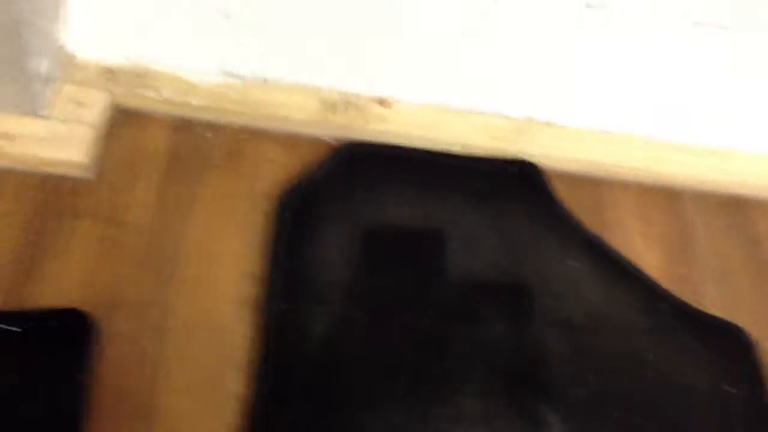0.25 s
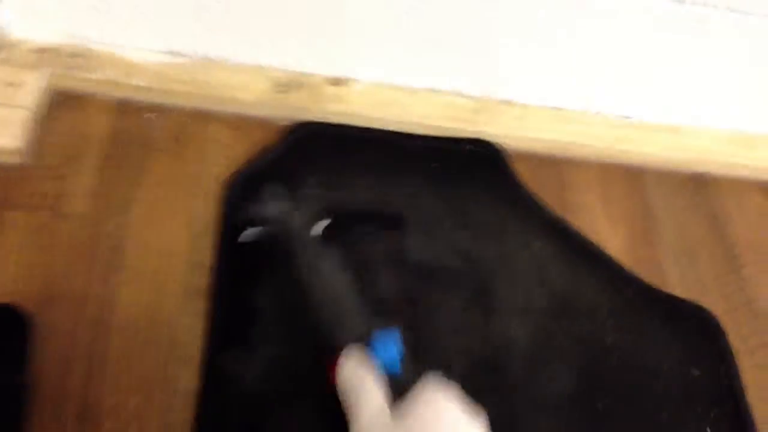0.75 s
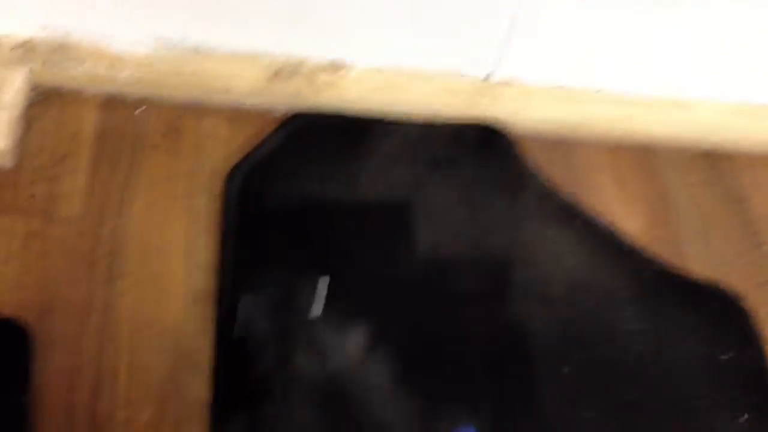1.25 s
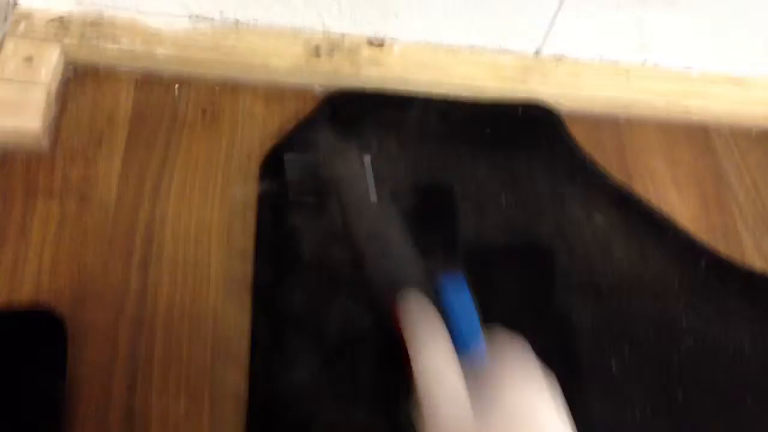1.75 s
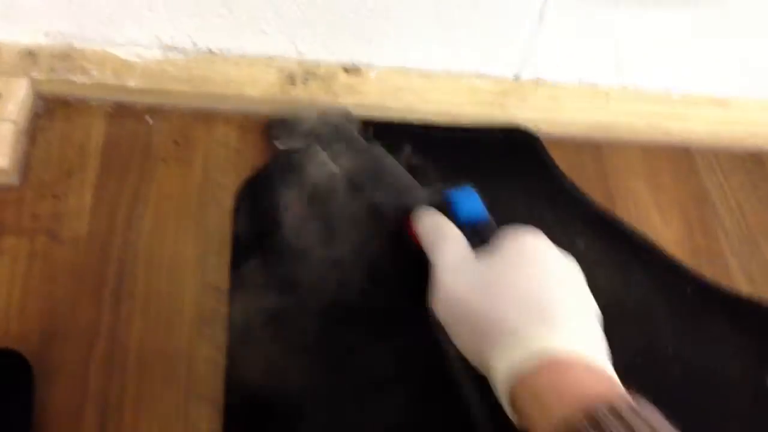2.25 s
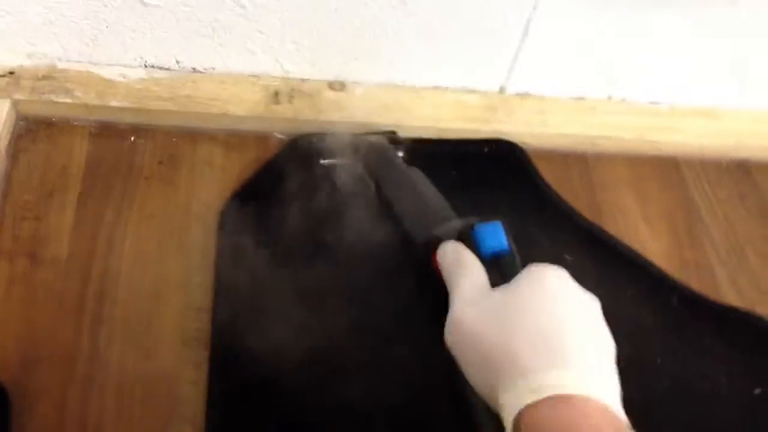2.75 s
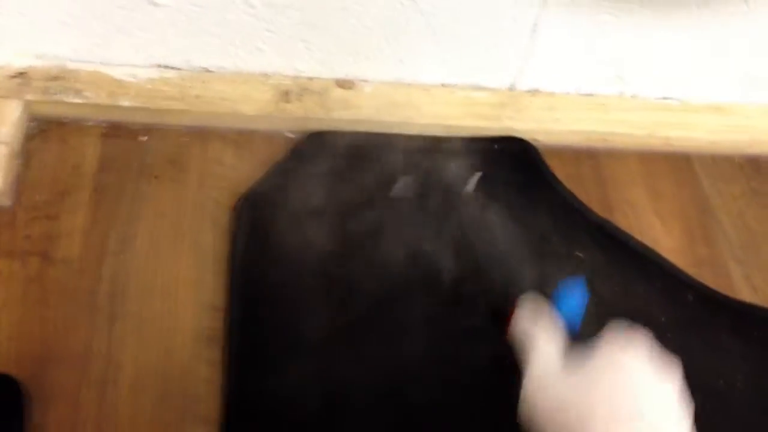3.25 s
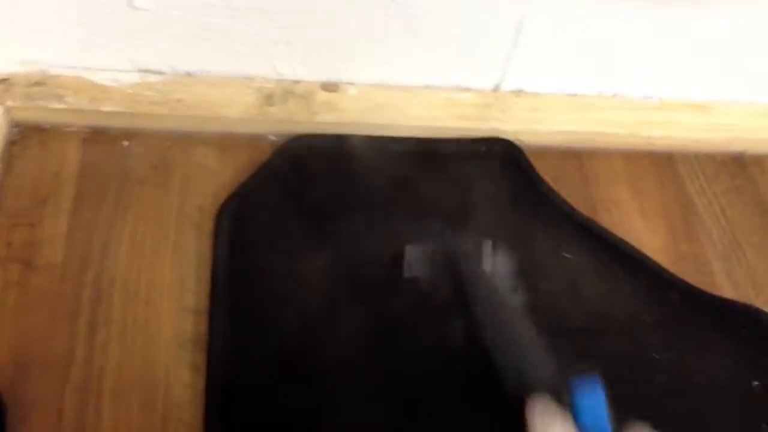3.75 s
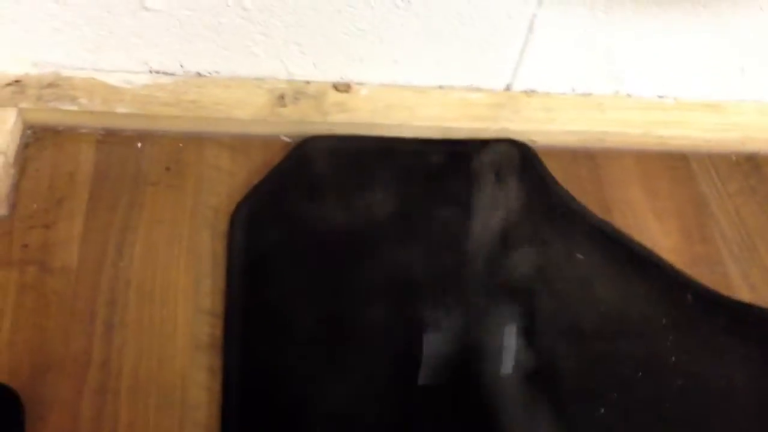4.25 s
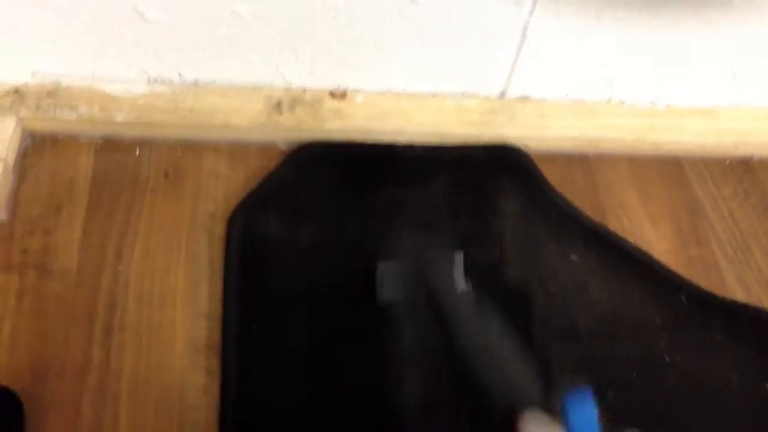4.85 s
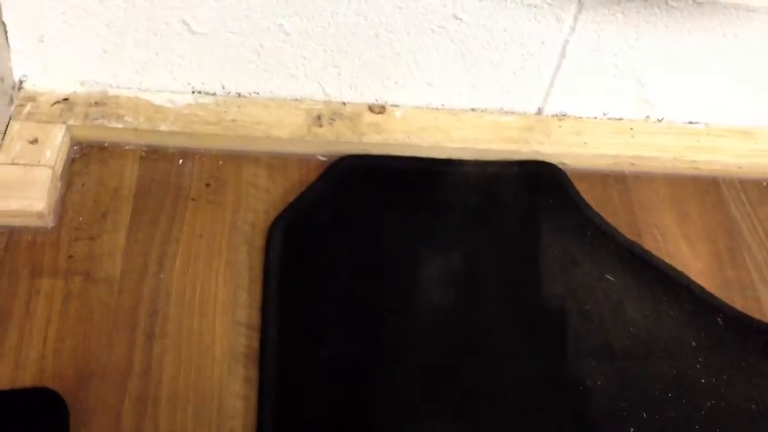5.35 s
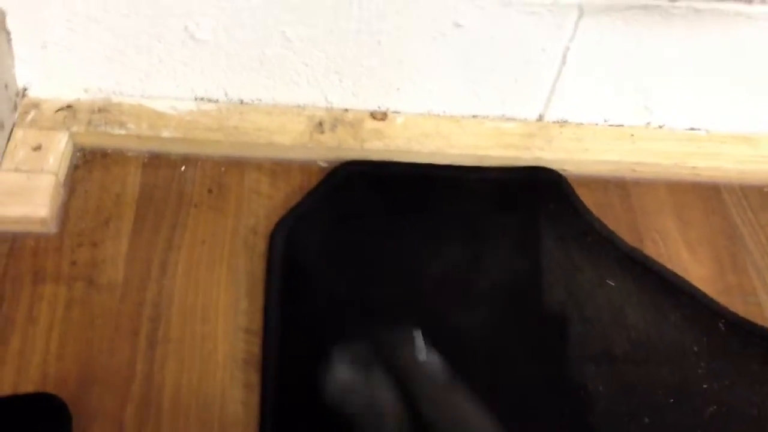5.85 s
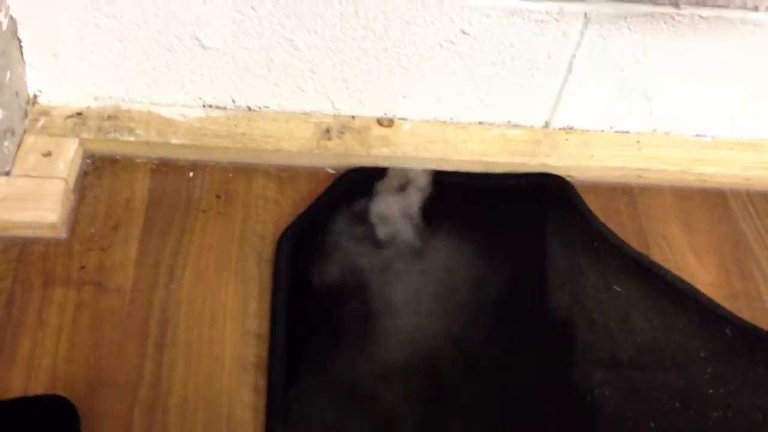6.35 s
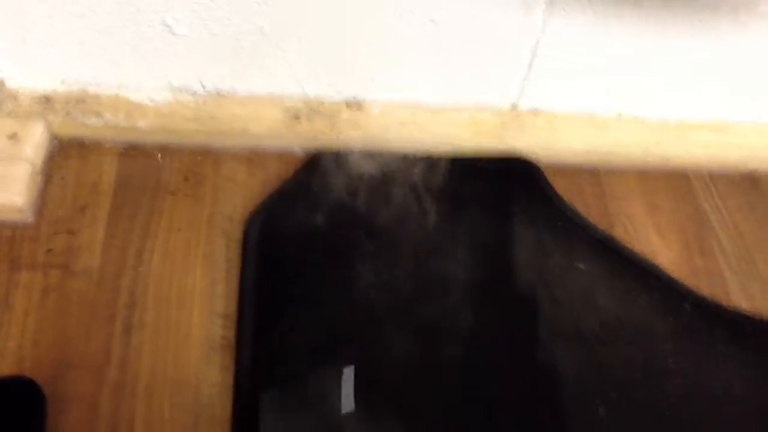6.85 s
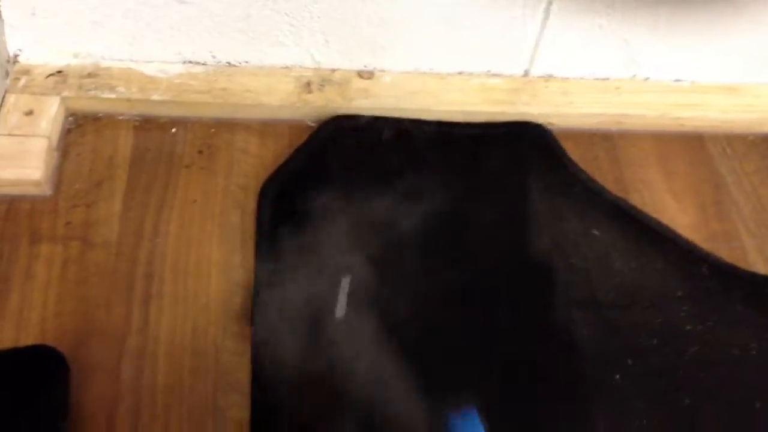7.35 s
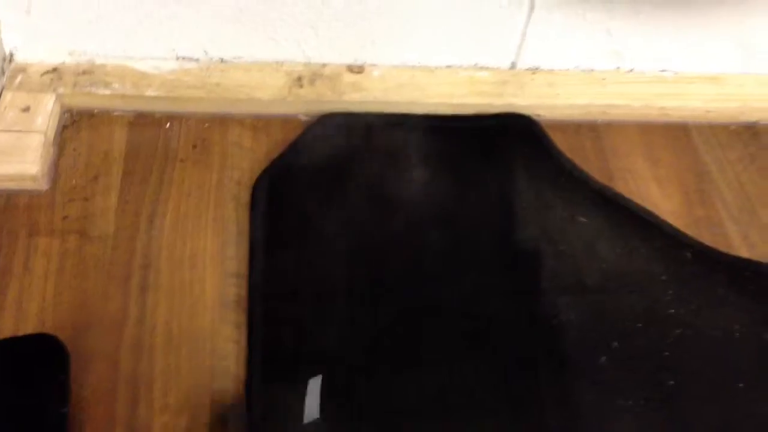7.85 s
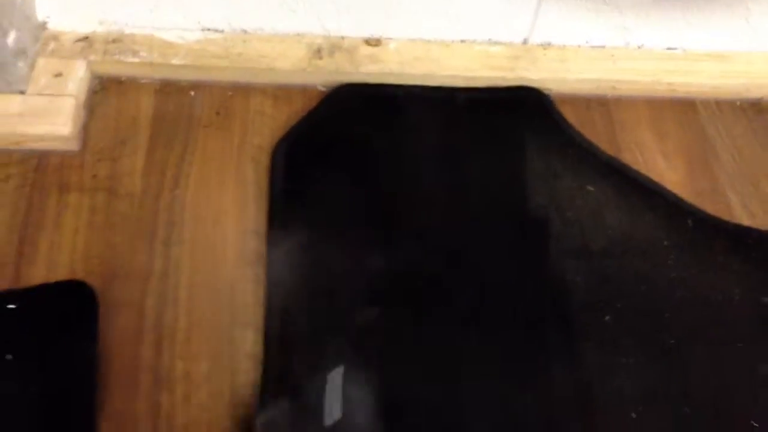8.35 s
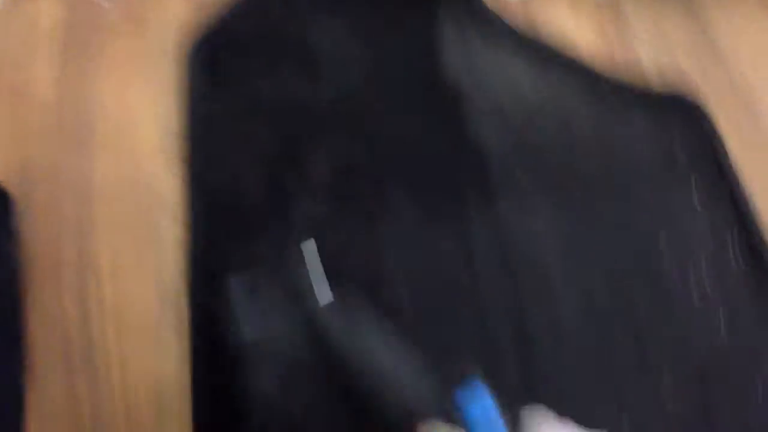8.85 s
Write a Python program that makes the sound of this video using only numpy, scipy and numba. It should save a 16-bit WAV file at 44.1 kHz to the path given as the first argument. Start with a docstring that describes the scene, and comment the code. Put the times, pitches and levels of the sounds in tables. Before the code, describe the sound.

Gusty hiss of steam and air from a cleaner head sweeping over a carpeted mat, with a steady motor whine and brief high whistles.

```python
"""First comes a gusty roar and hiss: steam and air tear through the slot of a steam cleaner's suction head.
A hand sweeps the head to and fro over a carpet mat by a wall, and it rumbles on the pile. The wall's
echo mixes with the hiss and changes its colour as the head nears and leaves it. The vacuum motor sings a
steady tone over its own air noise. Now and then the slot whistles or the head scrapes. One microphone."""
import sys
import numpy as np
from scipy import signal
from scipy.fft import rfft, irfft
from scipy.io import wavfile
from scipy.ndimage import uniform_filter1d, map_coordinates
from numba import njit

SR = 44100
rng = np.random.default_rng(int(sys.argv[2]) if len(sys.argv) > 2 else 0)


def store_pcm(level_fs):
    """Save levels as 16-bit WAV."""
    pcm = np.round(np.clip(level_fs, -1, 1) * 32767).astype(np.int16)
    wavfile.write(sys.argv[1], SR, np.atleast_2d(pcm).T)


N = 401310

# the slot's four noises, low to high: f/Hz, width/Hz, relative level/dB
RUSH_BANDS = [(535, 257, -1.4), (882, 470, 0.86)]
ROAR_BANDS = [(1460, 680, 0.5), (2060, 1070, 0)]
JET_BANDS = [(3000, 1060, -1.2), (4150, 2100, 0.71)]
HISS_BANDS = [(5770, 2900, 4.5), (7320, 3100, -2), (8880, 1300, -4)]
# how hard the flow drives each noise, in three blocks: t/s, rush/dB, roar/dB, jet/dB, hiss/dB
FLOW_DRIVE = [
    [(0.0, -37, -27, -27, -32), (0.07, -40, -27.5, -25, -25), (0.29, -39.5, -37.5, -33, -35),
     (0.53, -35.5, -27.5, -28.5, -34), (0.7, -40, -34, -40, -35), (0.77, -51, -43, -40, -37),
     (0.81, -44, -36.5, -34, -37), (0.96, -37.5, -33, -25.5, -30.5), (0.98, -41, -40, -29.5, -31.5),
     (1.11, -38.5, -34, -30, -34), (1.14, -48, -45, -33, -42), (1.22, -36.5, -32, -30, -32),
     (1.39, -37, -28.5, -30.5, -35), (1.42, -55, -45, -36, -39), (1.44, -39, -29, -42, -40),
     (1.45, -35, -40, -33, -37), (1.48, -38, -36, -40, -34), (1.55, -38, -31.5, -33, -35),
     (1.63, -32, -28, -28, -32), (1.66, -31.5, -25, -26, -31), (1.74, -29, -26, -26, -35),
     (1.77, -42, -36, -31, -35), (1.84, -34, -28.5, -30, -32), (1.87, -42, -49, -32, -35),
     (1.9, -39, -30, -30, -36), (2.14, -55, -38, -35, -38), (2.23, -35, -26, -29, -37),
     (2.31, -38, -29, -27.5, -33), (2.34, -34.5, -30, -31.5, -41), (2.48, -49, -35.5, -28, -26.5),
     (2.58, -34, -33, -28.5, -38), (2.59, -48, -28, -29.5, -39), (2.71, -41, -43, -31.5, -38),
     (2.74, -39, -34, -40, -50), (2.78, -45, -52, -39, -41), (2.95, -40, -36, -39, -41),
     (3.0, -43, -37, -32, -36)],
    [(3.0, -47, -38, -30, -37), (3.05, -40, -25.5, -25.5, -30), (3.13, -40, -30, -28.5, -32),
     (3.31, -39, -35, -28.5, -36), (3.35, -38, -40, -33, -50), (3.41, -54, -48, -40, -50),
     (3.48, -43, -48, -44, -48), (3.54, -43, -47, -35, -50), (3.57, -42, -48, -31, -32),
     (3.58, -40, -29, -30, -39), (3.63, -50, -29, -26, -31), (3.69, -43, -32, -31, -33),
     (3.84, -50, -31.5, -29.5, -37), (3.91, -40, -33.5, -28, -37), (3.93, -36, -46, -37, -42),
     (3.98, -39, -39, -36, -45), (4.12, -45, -40, -42, -49), (4.13, -41, -43, -36, -51),
     (4.19, -52.5, -31, -27.5, -37), (4.24, -44, -33, -27.5, -33), (4.84, -37, -29, -27, -34),
     (4.97, -55, -31, -31, -35), (5.0, -40, -30, -28, -35), (5.13, -44, -43, -39, -46),
     (5.18, -40, -28.5, -29.5, -32.5), (5.26, -42, -25.5, -26.5, -28), (5.36, -40, -34.5, -27, -32),
     (5.56, -42, -32, -28.5, -34), (5.66, -41, -35.5, -33.5, -41), (5.77, -39, -38.5, -28, -36),
     (5.93, -37.5, -32, -29.5, -36), (5.96, -51, -45, -34, -38), (5.98, -39, -47, -30, -33),
     (6.0, -50, -33, -35, -50)],
    [(6.0, -45, -43, -34, -49), (6.02, -55, -33, -37, -39), (6.09, -41, -47, -42, -43),
     (6.23, -58, -37, -32, -34), (6.28, -42, -39, -32.5, -35), (6.56, -38, -35, -27.5, -33),
     (6.64, -44, -40, -33, -37), (6.65, -47, -46, -33.5, -46), (6.76, -39, -35, -32, -37),
     (6.9, -40, -33, -31.5, -37), (6.91, -34, -43, -38, -33), (6.95, -43, -28, -29.5, -33),
     (7.1, -34, -38, -35, -35), (7.12, -44, -31, -37, -34), (7.19, -57, -42, -51, -35),
     (7.3, -56, -37.5, -43, -39), (7.33, -57, -51, -44, -33), (7.42, -34, -26, -27.5, -30.5),
     (7.59, -36.5, -22, -23.5, -29.5), (7.75, -37, -29, -28.5, -37.5), (7.89, -30, -22.5, -24.5, -29),
     (8.04, -35, -23.5, -27.5, -33), (8.17, -39, -35.5, -31.5, -38), (8.28, -36, -31.5, -31, -34),
     (8.33, -35.5, -27, -28, -35), (8.41, -38, -22.5, -26.5, -32), (8.47, -38, -28.5, -26, -35),
     (8.49, -38, -31, -25.5, -36), (8.58, -39, -35, -30, -31), (8.61, -46, -44, -32, -36),
     (8.63, -36, -34, -29.5, -35), (8.68, -38, -29, -27, -38), (8.76, -42, -30, -28.5, -37),
     (8.8, -39, -36, -30, -38), (8.88, -39.5, -42, -33.5, -39), (8.94, -39, -43, -29, -34),
     (9.0, -45, -47, -41, -45), (9.06, -37, -43, -31, -41), (9.1, -43, -52, -45, -45)],
]
# two narrow peaks in the roar and jet glide in pitch as the head moves:
# t/s, low f/Hz, level within roar/dB, high f/Hz, level within jet/dB
GLIDING_PEAKS = [(0, 2130, -6, 3600, 0), (.3, 2060, -2, 3900, -4), (.55, 1790, -12, 3470, -2),
                 (.85, 2010, -11, 4100, -9), (1.1, 1690, -2, 3170, -13), (1.36, 1730, -12, 3080, -4),
                 (1.56, 1800, 1, 4320, -2), (1.64, 2000, -11, 3770, -13), (1.72, 1700, -12, 3100, -5),
                 (1.95, 2130, -8, 3830, -9), (2.18, 1980, -6, 3620, -9), (2.3, 1370, -1, 3120, 5),
                 (2.45, 1550, -1, 4360, -14), (2.58, 1610, -2, 4160, -5), (2.8, 2010, -13, 4000, -14),
                 (3.02, 2000, -6, 4530, -6), (3.12, 1530, -1, 4120, 2), (3.25, 1570, 8, 4440, -1),
                 (3.35, 2000, -13, 4930, -10), (3.57, 2040, 5, 4900, -1), (3.62, 1750, -2, 4200, -3),
                 (3.68, 1400, 1, 3900, 1), (3.76, 1360, -5, 3650, -1), (3.84, 1400, -2, 4280, -1),
                 (3.91, 1550, -6, 5260, -5), (4.17, 2150, 4, 4700, -2), (4.2, 1850, 0.5, 4300, 1),
                 (4.24, 1500, -5, 3700, -1), (4.3, 1340, -8, 3720, -12), (4.38, 1810, -1, 4100, -7),
                 (4.45, 1520, -2, 4000, -5), (4.54, 1630, -6, 4300, -3), (4.62, 1760, 3, 3900, -14),
                 (4.68, 1800, -6, 3800, -9.5), (4.74, 1970, 6.5, 3820, -9), (4.96, 1640, -17, 4120, -3),
                 (5.14, 2300, -10, 5000, -4), (5.17, 1980, -5, 4720, 8), (5.22, 1570, -7, 3600, -2),
                 (5.28, 1400, -4, 3500, -8), (5.47, 1690, -7, 4200, -17), (5.75, 1770, 4, 4050, -8),
                 (6.1, 1830, -7, 4170, -9), (6.55, 1540, -9, 4100, -14), (6.97, 1790, -3, 4000, -11),
                 (7.3, 1670, -7, 3900, -8), (7.42, 1950, -3, 3300, 1), (7.5, 1510, -6, 3180, -5),
                 (7.58, 1750, -6, 3960, -5), (7.72, 1630, -6, 3220, -13), (7.8, 1650, -4, 4100, -5),
                 (7.87, 1700, -13, 3760, 2), (7.93, 1650, -12, 3500, -6), (8.03, 1600, -11, 3200, -2),
                 (8.12, 1400, -9, 4000, 0), (8.25, 1500, -12, 3600, -9), (8.36, 1340, -2, 3250, -6),
                 (8.44, 1700, -7, 3700, -6), (8.7, 1610, -14, 4130, 1), (9.1, 1770, -5, 4000, -16)]
# strength of the three sizzle bands: t/s, low/dB, middle/dB, high/dB
SIZZLE_LEVELS = [(0.0, -40, -39, -35), (0.05, -31, -27, -30), (0.1, -33, -25.5, -27), (0.12, -43, -35, -35),
                 (0.25, -42, -38, -42), (0.56, -37, -41, -39), (0.81, -42, -47, -48), (0.94, -42, -40, -35),
                 (1.06, -47, -41, -43), (1.54, -38, -48, -44), (1.7, -33, -40, -43), (1.8, -41, -45, -44),
                 (1.82, -36, -40, -35), (1.98, -43, -45, -49), (2.23, -42, -48, -47), (2.28, -35, -41, -43),
                 (2.36, -43, -50, -43), (2.48, -35, -38, -36), (2.74, -47, -54, -54), (2.99, -43, -49, -45),
                 (3.09, -35, -34, -29), (3.17, -45, -47, -50), (3.4, -44, -53, -50), (3.6, -42, -46, -45),
                 (3.67, -41, -40, -38), (3.85, -44, -48, -51), (4.16, -43, -46, -48), (4.43, -40, -36, -39),
                 (4.64, -44, -47, -47), (4.74, -43, -37, -41), (5.14, -41, -49, -54), (5.19, -41, -46, -45),
                 (5.25, -33, -34, -33), (5.3, -36, -34, -30), (5.35, -43, -39, -40), (5.62, -42, -38, -44),
                 (5.93, -41, -42, -37), (6.03, -40, -48, -49), (6.16, -43, -47, -47), (6.26, -44, -43, -35),
                 (6.51, -38, -34.5, -44), (6.82, -44, -38, -44), (6.97, -42, -37, -34),
                 (7.07, -38, -45, -43), (7.27, -41, -51, -44), (7.45, -33, -41, -32), (7.58, -44, -27, -34),
                 (7.78, -49, -41, -43), (7.83, -42, -32, -36), (7.98, -35, -33, -33), (8.11, -43, -48, -45),
                 (8.44, -40, -36, -34), (8.46, -48, -38, -41), (8.72, -47, -35, -37), (9.02, -49, -50, -47),
                 (9.1, -45, -41, -40)]
# borders of those bands: f/Hz
SIZZLE_EDGES = [9450, 11200, 13600, 16500]
# added to each band's strength: gain/dB
SIZZLE_GAINS = [-2.2, -1.5, 3]
# where the hand turns: t/s, echo delay/ms, rumble of the next stroke/dB, echo share/0-1
HAND_TURNS = [(-.05, 0.92, -46.5, 0.3), (.27, 1.9, -41.5, 0.44), (.78, 0.64, -44.5, .35),
              (1.13, 1.6, -39.5, 0.56), (1.6, 0.5, -38, 0.3), (1.93, .9, -40, 0.4),
              (2.28, 0.28, -40.5, 0.27), (2.57, 0.6, -43.5, 0.38), (2.9, 0.35, -39, 0.2),
              (3.17, 0.62, -41.5, 0.3), (3.47, 0.22, -43, 0.06), (3.75, 0.75, -40.5, 0.3),
              (4.04, 0.22, -44, 0.38), (4.62, 1.7, -42, 0.42), (5.12, 0.4, -45, 0.14),
              (5.63, 1.84, -42, 0.5), (6.1, 0.66, -46, .15), (6.65, 2.04, -42.5, 0.53),
              (7.22, 0.67, -43, 0.72), (7.71, 1.95, -41, 0.4), (8.15, 0.82, -44.5, 0.44),
              (8.68, 2.53, -47, 0.5), (9.04, 1.7, -46, 0.3), (9.3, 2, -48, .15)]
# the head's rumble on the pile: f/Hz, width/Hz, relative level/dB
DRAG_BANDS = [(159, 38, -5.5), (211.5, 66, -2), (274, 144, -1)]
# the motor's tones: t/s, shaft f/Hz, shaft level/dB, blade level/dB
MOTOR_TONES = [(0, 340, -35, -45), (.6, 337, -34.5, -42), (1.6, 337.6, -34.5, -58),
               (1.9, 337.5, -35, -42.5), (2.7, 340.2, -34.5, -40), (3.08, 341, -35.5, -46),
               (3.35, 340.6, -36, -39), (3.6, 338.7, -36.5, -46), (3.9, 340, -36.5, -39.5),
               (4.3, 341.7, -37, -44), (4.7, 340, -35.5, -39), (5.4, 336.8, -35.5, -45),
               (5.9, 340, -36.5, -43), (6.5, 340.4, -37.5, -44), (7.1, 341.8, -37.5, -47),
               (7.45, 342, -37.5, -40), (7.9, 339.3, -36.5, -46), (8.3, 336.7, -37.5, -57),
               (9.1, 337.4, -36.5, -42)]
# a faint hum: t/s, level/dB
HUM_LEVELS = [(0, -48), (6.1, -53), (7.3, -44.5), (7.7, -62), (8.6, -59), (8.9, -46), (9.1, -63)]
# the fan's air noise: f/Hz, relative level/dB
FAN_COLOUR = [(18, -87), (30, -62), (70, -38), (168, -17.5), (255, -16), (339, -5.5), (418, -14),
              (502, -12), (1760, -5), (2530, -8.5), (4050, -4.5), (4800, -8), (5500, -13.5), (7000, -14),
              (10000, -18), (13000, -27), (15300, -22)]
# the slot's short whistles: start t/s, length/s, level/dB, f/Hz
SLOT_CHIRPS = [(.33, .06, -45, 9330), (.7, .08, -44, 9400), (.98, .07, -37, 8800), (1.395, 0.05, -37, 9250),
               (1.87, .06, -38, 8820), (2.005, 0.091, -35, 8700), (2.64, 0.059, -36.5, 8850),
               (2.727, .03, -41, 8800), (2.98, .074, -42, 9000), (3.115, 0.039, -29.5, 8700),
               (3.165, .04, -41, 9000), (3.226, .05, -40, 8860), (3.31, 0.052, -41, 9100),
               (3.532, 0.087, -39, 8900), (3.673, 0.094, -38, 8960), (3.776, .02, -38, 9500),
               (3.8, 0.035, -29.5, 8750), (3.877, 0.076, -41, 8970), (4.136, 0.02, -30, 9120),
               (4.242, 0.17, -36, 8800), (4.43, 0.082, -42, 8800), (4.544, 0.026, -49, 8800),
               (4.8, 0.16, -36, 8800), (5.01, 0.036, -47, 8950), (5.332, 0.14, -35, 8800),
               (5.75, .05, -44, 8800), (6.08, .05, -44, 8750)]
# the head digs into the pile: t/s, half length/s, level/dB
SCRAPE_SWELLS = [(1.3, .07, -40), (1.66, 0.078, -45), (2.262, 0.058, -41), (4.962, 0.04, -39),
                 (5.82, 0.059, -37), (6.25, 0.047, -40), (6.812, 0.032, -40), (6.995, 0.05, -32)]
# the rumble of a scrape: f/Hz, width/Hz, relative level/dB
SCRAPE_BANDS = [(169, 60, 1), (211, 31, 2.5)]

TIME = np.arange(N) / SR


def undb(db):
    """Turn decibels into a factor to multiply by."""
    return 10 ** (np.asarray(db) / 20)


def unit(x):
    """Scale a signal to an average (RMS) size of 1."""
    return x / np.sqrt(np.mean(x ** 2))


def curves(table):
    """Join a table's rows with straight lines: one curve for each column after the time."""
    times, *columns = np.transpose(table)
    return [np.interp(TIME, times, column) for column in columns]


def wobble(rate):
    """A smooth random curve of size 1 that heads for a new value `rate` times a second."""
    hold = int(SR / rate)
    steps = np.repeat(rng.standard_normal(N // hold + 1), hold)
    return unit(uniform_filter1d(uniform_filter1d(steps, hold), hold)[:N])


@njit
def bandpass(x, hz, width):
    """Let through only the sound near a pitch that may move."""
    y, band, low = np.empty(len(x)), 0., 0.
    for i in range(len(x)):
        tuning, damping = np.tan(np.pi * hz[i] / SR), width / hz[i]
        passed = (band + tuning * (x[i] - low)) / (1 + tuning * (tuning + damping))
        band, low = 2 * passed - band, low + 2 * tuning * passed
        y[i] = damping * passed
    return y


def noise_bands(bands, flicker_db, rate, drift, gust_db=0):
    """Bands of noise: each drifts in pitch and flickers by itself, and all share the gusts."""
    total = 0
    for hz, width, db in bands:
        centre = np.minimum(hz * (1 + drift * wobble(3)), .45 * SR)
        band = bandpass(rng.standard_normal(N), centre, float(width))
        band = bandpass(band, centre, 1.41 * width)
        total += unit(band) * undb(db + flicker_db * wobble(rate))
    return unit(total * undb(gust_db))


def slot_flow():
    """Steam and air tear through the slot in quick gusts; two narrow peaks glide in pitch."""
    usual_flow_db, usual_sizzle_db = -30, -44
    rush_db, roar_db, jet_db, hiss_db = np.array(curves(np.vstack(FLOW_DRIVE))) - usual_flow_db
    low_hz, low_db, high_hz, high_db = curves(GLIDING_PEAKS)
    low_peak, high_peak = (low_hz, 190, low_db), (high_hz, 520, high_db)
    sizzle_db = curves(SIZZLE_LEVELS)
    gust = wobble(40)
    roar = noise_bands(ROAR_BANDS + [low_peak], flicker_db=1.8, rate=16, drift=.04, gust_db=.89 * gust)
    rush = noise_bands(RUSH_BANDS, flicker_db=.57, rate=16, drift=.012, gust_db=1.9 * gust)
    jet = noise_bands(JET_BANDS + [high_peak], flicker_db=.42, rate=22, drift=.013, gust_db=.52 * gust)
    hiss = noise_bands(HISS_BANDS, flicker_db=.4, rate=15, drift=.041, gust_db=1.05 * gust)
    # each noise has a usual level and grows with the flow; the hiss also follows the middle sizzle
    roar *= undb(-28.5 + .78 * roar_db)
    rush *= undb(-29.5 + rush_db)
    jet *= undb(-29 + jet_db)
    hiss *= undb(-29.5 + .78 * hiss_db + .17 * (sizzle_db[1] - usual_sizzle_db))
    slot = roar + rush + jet + hiss + sizzle(sizzle_db, 1.04 * gust)
    return slot - .19 * bandpass(slot, hz=np.full(N, 2560.), width=120.)  # a narrow dip in the colour


def sizzle(levels_db, gust_db):
    """The highest part of the slot's noise: three broad bands, each flickering by itself."""
    total = 0
    for low, high, gain_db, db in zip(SIZZLE_EDGES, SIZZLE_EDGES[1:], SIZZLE_GAINS, levels_db):
        band_filter = signal.butter(2, [low, high], "band", fs=SR, output="sos")
        band = signal.sosfilt(band_filter, rng.standard_normal(N))
        total += unit(band) * undb(gain_db + db + 1.4 * wobble(18) + gust_db)
    return total


def hand_strokes():
    """The hand eases from turn to turn, setting the echo's delay, the speed (0-1) and the rumble."""
    times, delay_ms, rumble_db, _ = np.transpose(HAND_TURNS)
    place = np.interp(TIME, times, np.arange(len(times)))
    stroke = np.minimum(place.astype(int), len(times) - 2)
    angle = np.pi * (place - stroke)
    eased_ms = delay_ms[stroke] + np.diff(delay_ms)[stroke] * (1 - np.cos(angle)) / 2
    return eased_ms, np.abs(np.sin(angle)), rumble_db[stroke]


def wall_echo(sound):
    """The wall sends the sound back a little later; from further off it returns duller."""
    far_hz, near_hz, dull_ms, patchy_db = 3600, 6500, 1.1, 1.5
    delay_ms = hand_strokes()[0] * (1 + .03 * wobble(12))  # the hand shakes a little
    far, near = (signal.sosfiltfilt(signal.butter(2, hz, fs=SR, output="sos"), sound)
                 for hz in (far_hz, near_hz))
    crisp = np.exp(-(delay_ms / dull_ms) ** 2)
    read_at = np.arange(N) - delay_ms * SR / 1000
    echo = map_coordinates(far + crisp * (near - far), [read_at], order=3, mode="nearest")
    share = curves(HAND_TURNS)[-1]
    return share * undb(patchy_db * wobble(6)) * echo


def carpet_drag():
    """The head rumbles on the pile, louder as each stroke speeds up."""
    _, speed, db = hand_strokes()
    swell = undb(db) * (undb(-28) + speed ** .29)  # a little rumble stays at each turn
    rumble = noise_bands(DRAG_BANDS, flicker_db=1.95, rate=11, drift=.032)
    return rumble * uniform_filter1d(swell, SR // 30)


def motor():
    """The spinning shaft and fan blades each sing a tone, over a faint hum and steady air noise."""
    blades, hum_hz, air_db = 6, 300, -29.5
    hz, shaft_db, blade_db = curves(MOTOR_TONES)
    angle = 2 * np.pi * np.cumsum(hz * (1 + .0013 * wobble(14))) / SR
    jitter = .7 * wobble(60)
    shaft = undb(shaft_db + .12 * wobble(2.7)) * np.sin(angle)
    blade = undb(blade_db + 2.5 * wobble(40)) * np.sin(blades * angle + jitter)
    hum = undb(curves(HUM_LEVELS)[0]) * np.sin(2 * np.pi * hum_hz * TIME)
    fan_hz, fan_db = np.transpose(FAN_COLOUR)
    log_hz = np.log(np.arange(1, N // 2 + 2) * SR / N)
    colour = undb(np.interp(log_hz, np.log(fan_hz), fan_db))
    air = unit(irfft(rfft(rng.standard_normal(N)) * colour, N))
    return np.sqrt(2) * (shaft + blade + hum) + undb(air_db) * air


def gate(start, end, fade_s):
    """Fade from 0 up to 1 at the start and back down at the end."""
    return np.clip(np.minimum(TIME - start, end - TIME) / fade_s + .5, 0, 1)


def slot_whistle():
    """Air on the slot's edge whistles unsteadily: short chirps, with a faint tone in between."""
    faint_db, faint_hz = -51, 9050.
    gain = gate(.3, 6.2, fade_s=.05) * undb(faint_db + 4 * wobble(21))
    hz = np.full(N, faint_hz)
    for start, length, db, chirp_hz in SLOT_CHIRPS:
        chirp = gate(start, start + length, fade_s=.013)
        gain += chirp * undb(db)
        hz += chirp * (chirp_hz - hz)
    centre = hz * (1 + .011 * wobble(110) + .007 * wobble(30))
    tone = bandpass(rng.standard_normal(N), centre, width=240.)
    tone = bandpass(tone, centre, width=500.)
    return unit(tone * undb(2.8 * wobble(80))) * gain


def carpet_scrapes():
    """The head scrapes harder into the pile, making short swells of rumble."""
    swells = sum(np.exp(-.5 * ((TIME - at) / half_s) ** 2) * undb(db) for at, half_s, db in SCRAPE_SWELLS)
    return noise_bands(SCRAPE_BANDS, flicker_db=.45, rate=11, drift=.039) * swells


def scene():
    """All the sounds add up at one microphone, which feeds both channels."""
    slot = slot_flow()
    mono = slot + wall_echo(slot) + slot_whistle() + carpet_drag() + carpet_scrapes() + motor()
    return np.array([mono, mono])


def record(dry):
    """The very highest treble is cut off steeply."""
    top_hz = 15310
    return signal.sosfilt(signal.ellip(16, .3, 80, top_hz, fs=SR, output="sos"), dry)


dry = scene()
out = record(dry)
store_pcm(out)
```